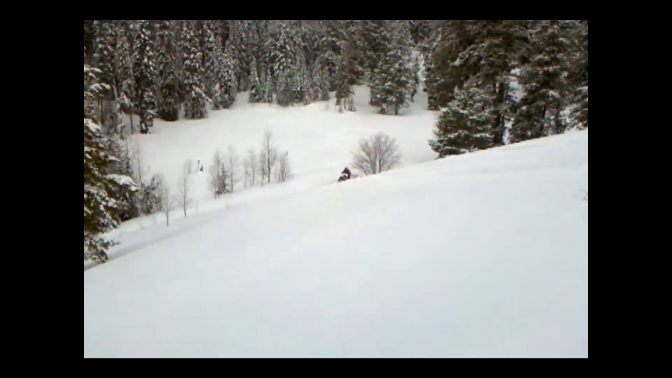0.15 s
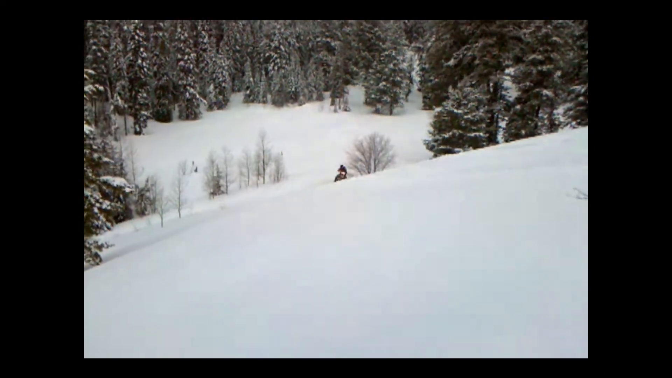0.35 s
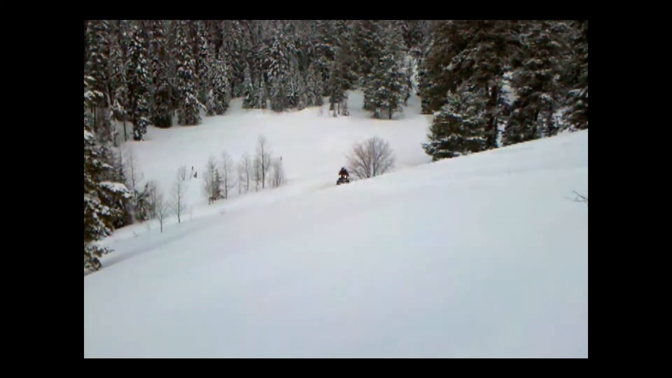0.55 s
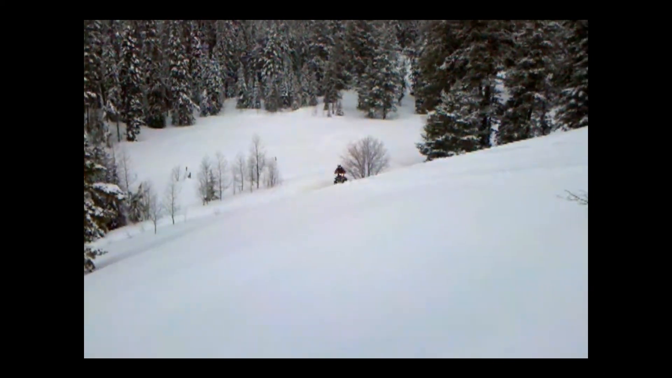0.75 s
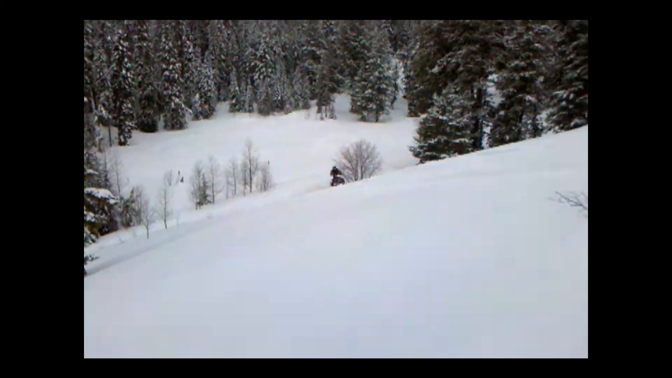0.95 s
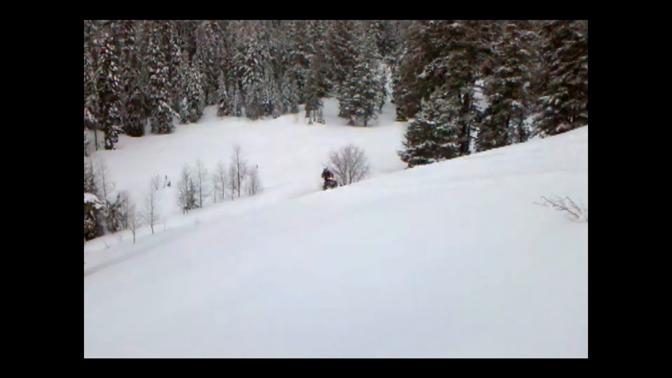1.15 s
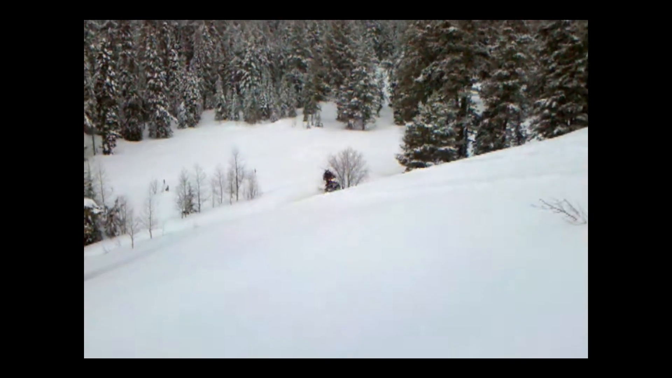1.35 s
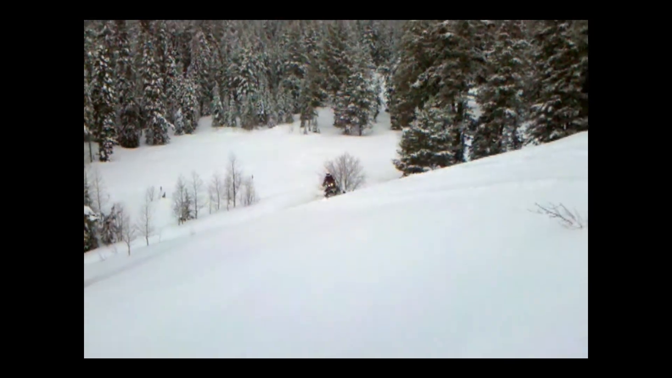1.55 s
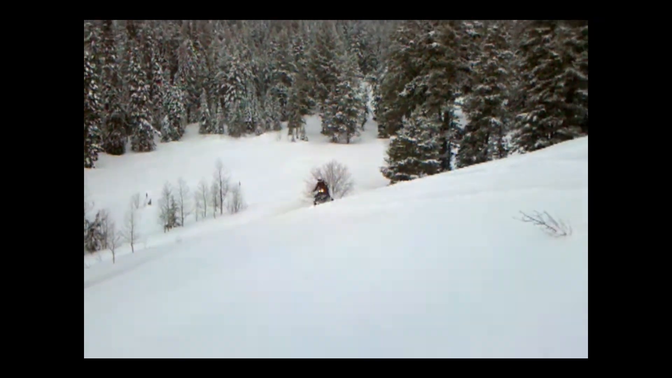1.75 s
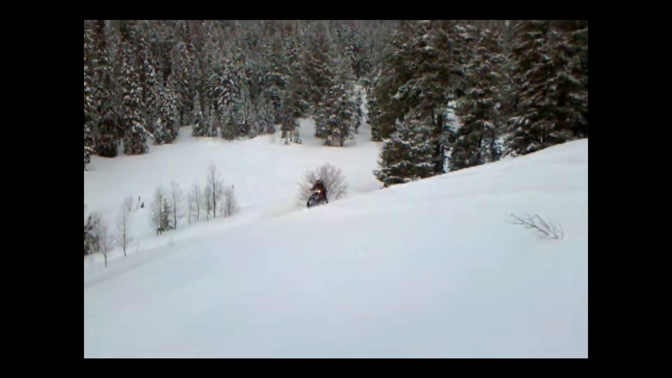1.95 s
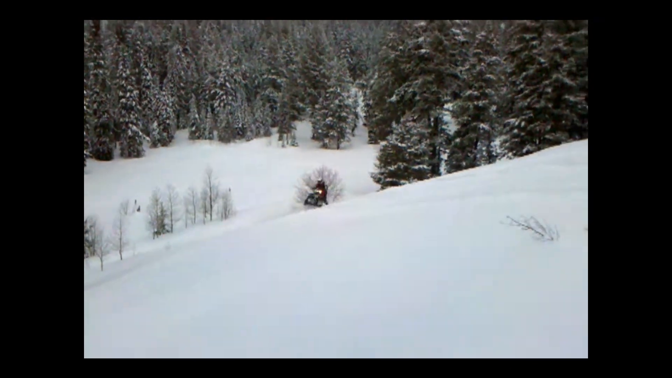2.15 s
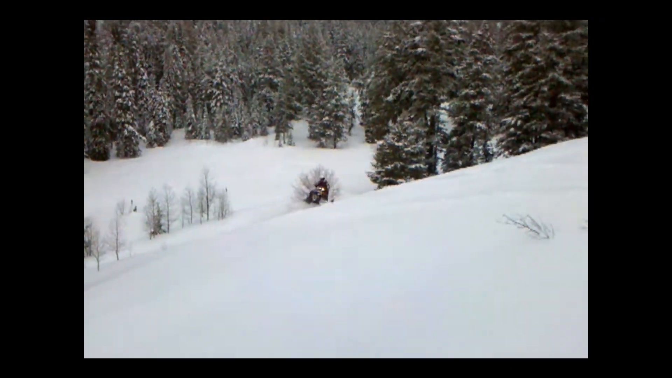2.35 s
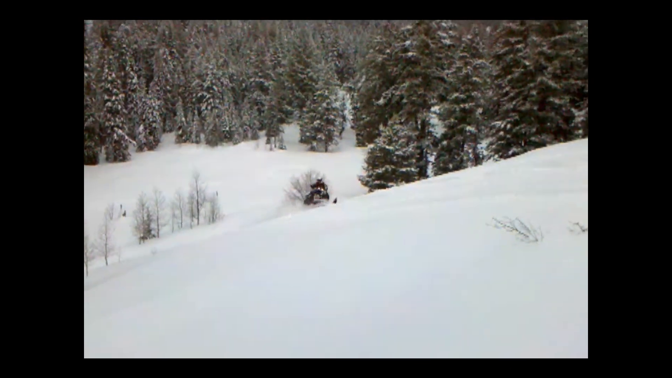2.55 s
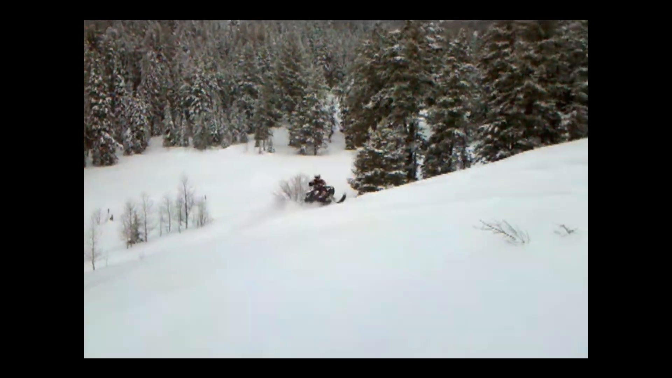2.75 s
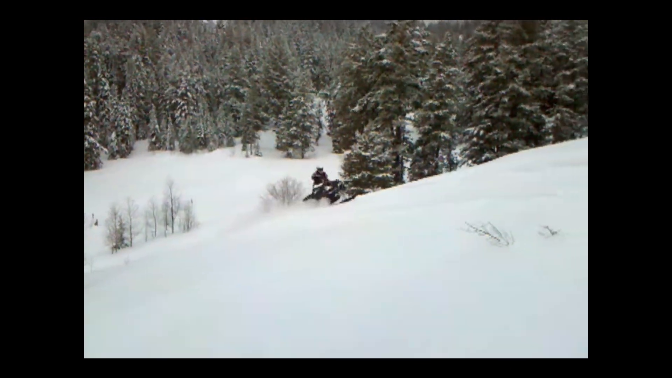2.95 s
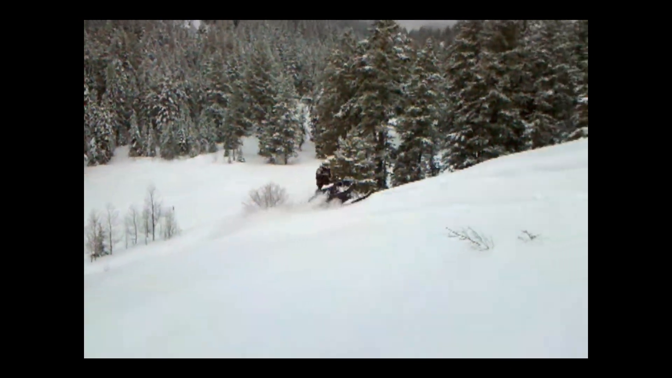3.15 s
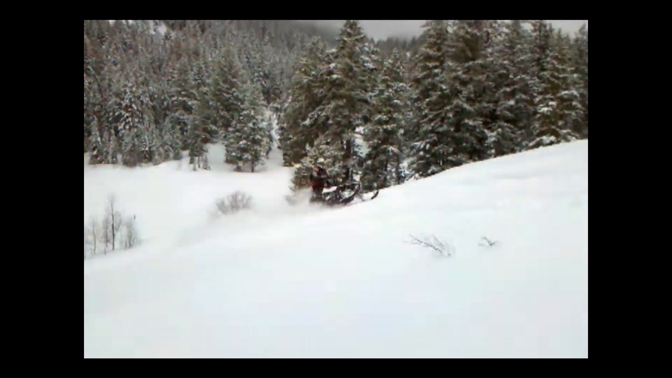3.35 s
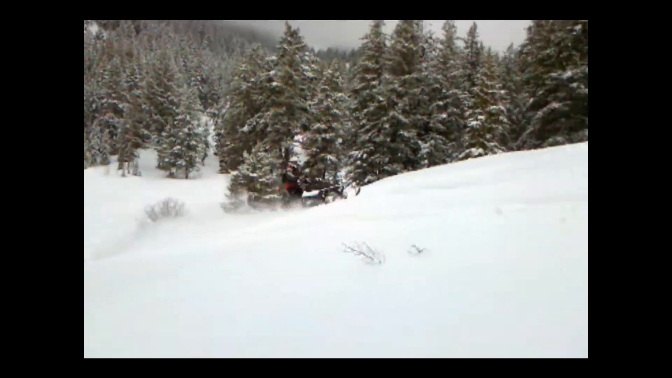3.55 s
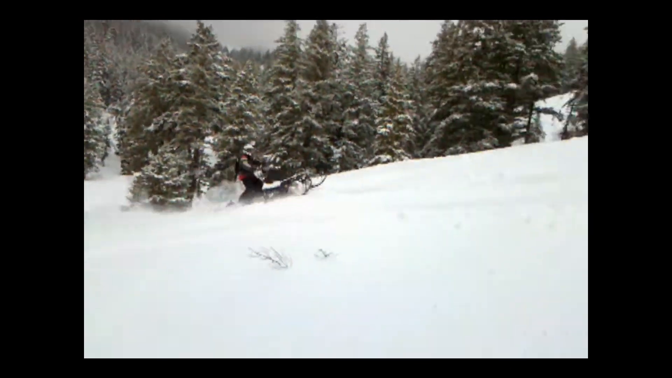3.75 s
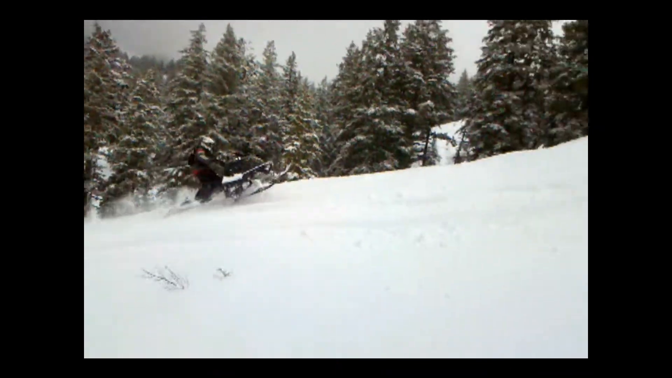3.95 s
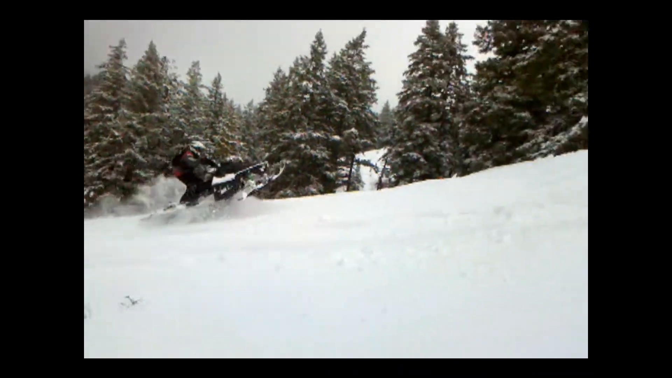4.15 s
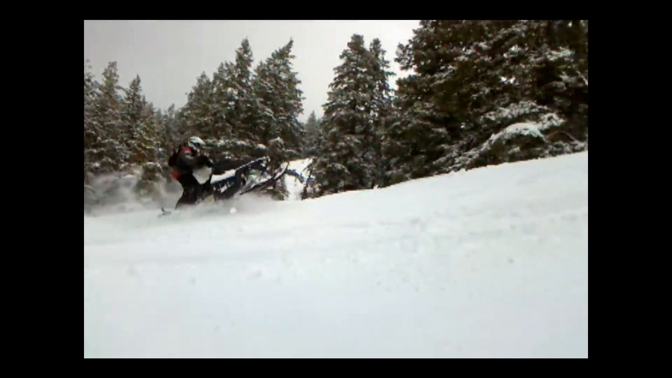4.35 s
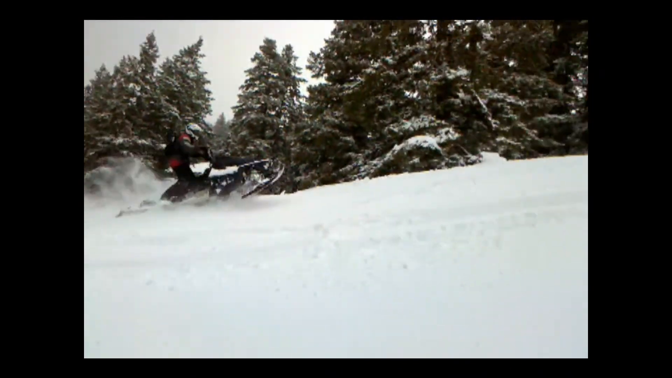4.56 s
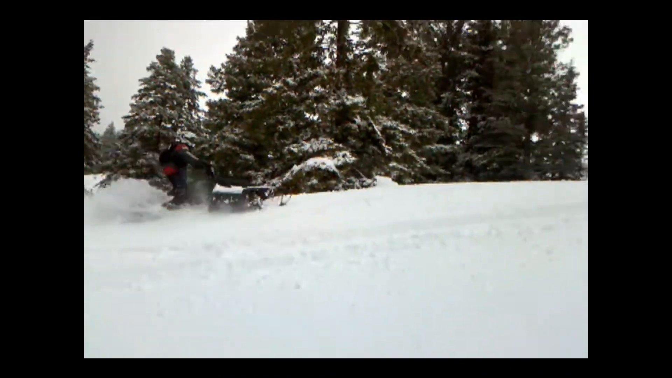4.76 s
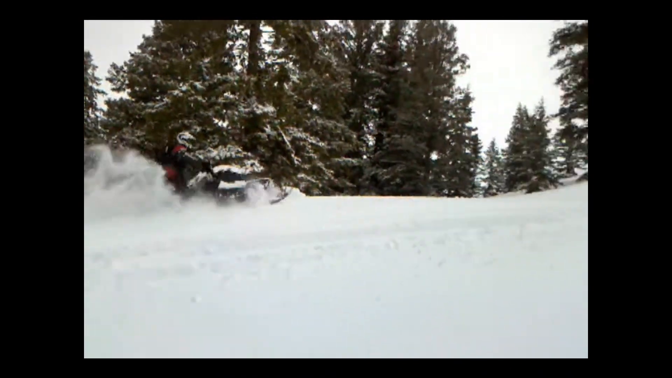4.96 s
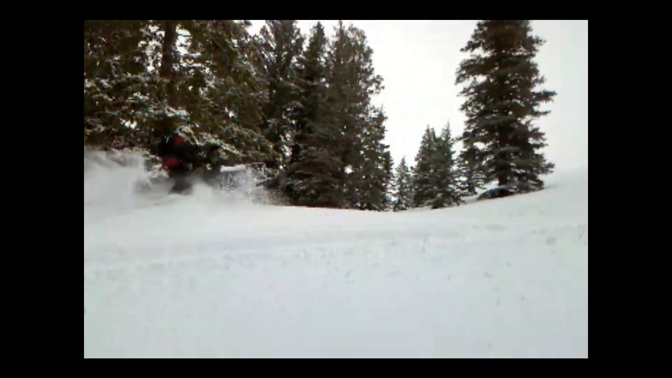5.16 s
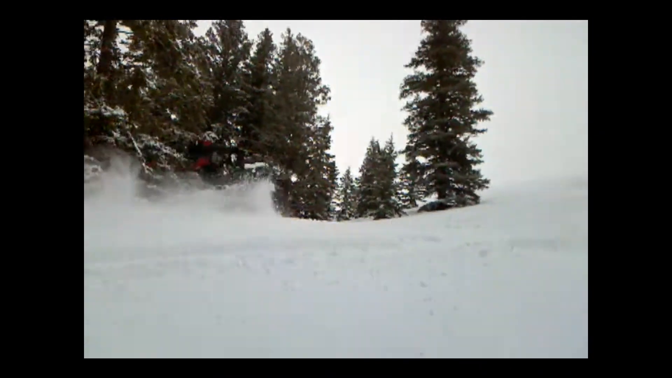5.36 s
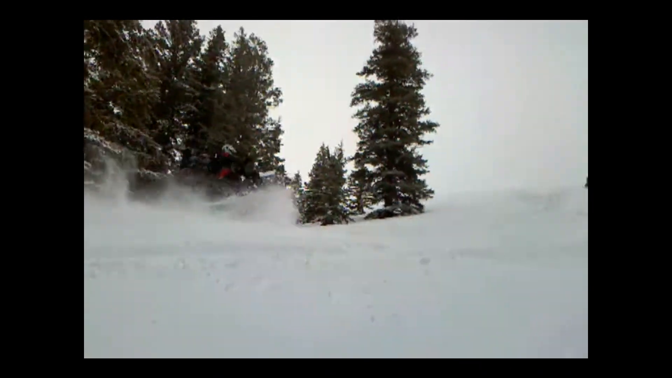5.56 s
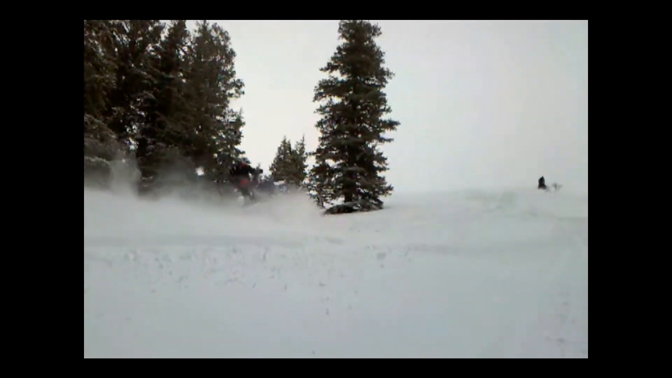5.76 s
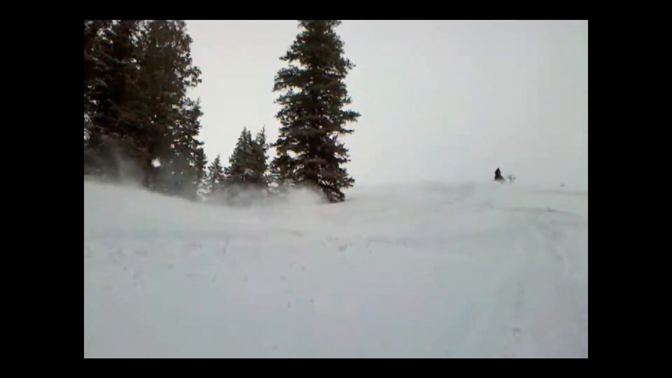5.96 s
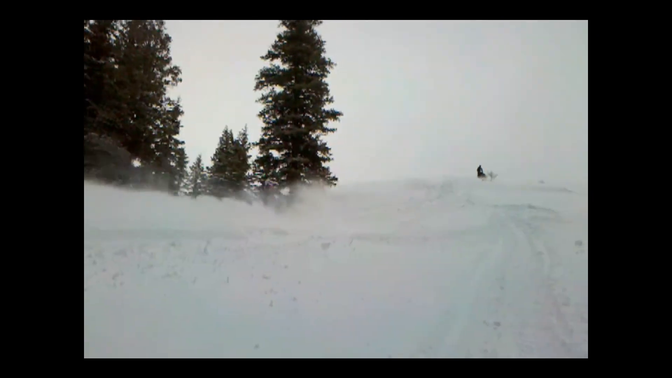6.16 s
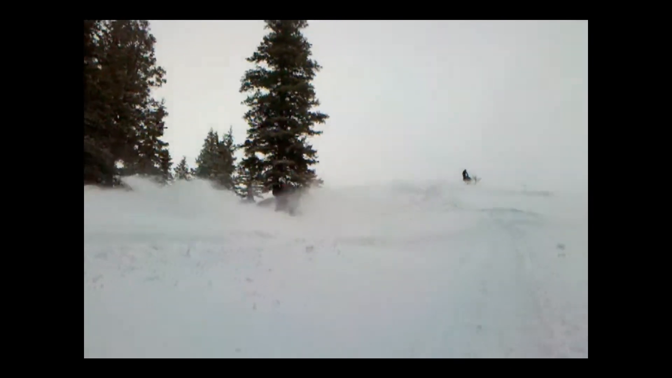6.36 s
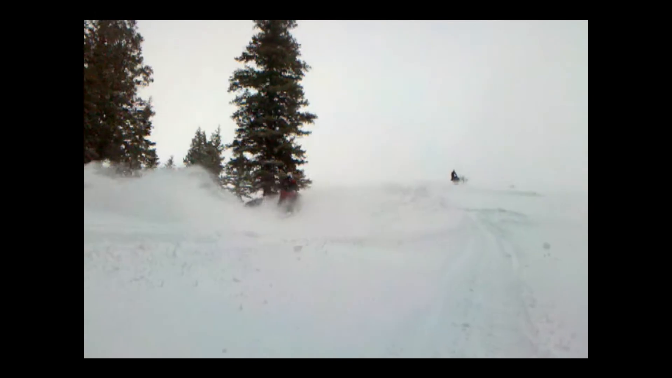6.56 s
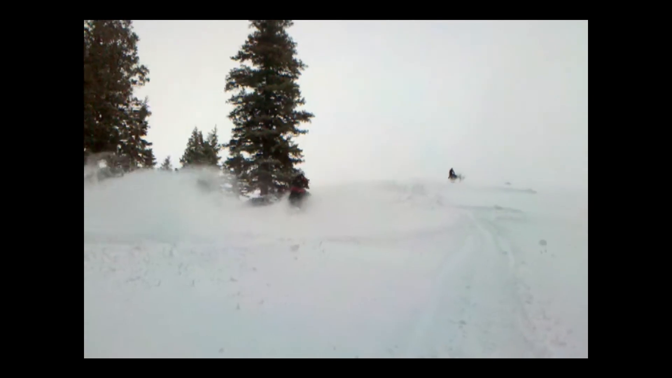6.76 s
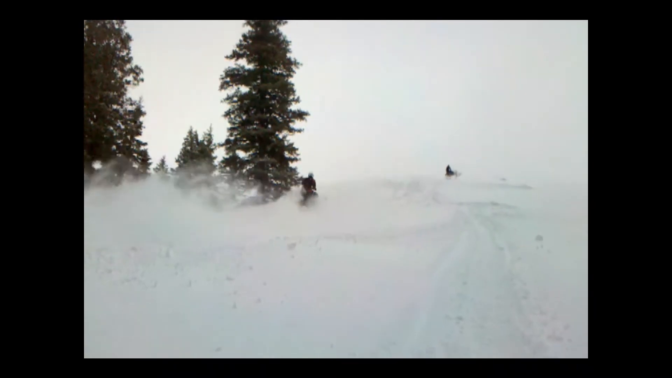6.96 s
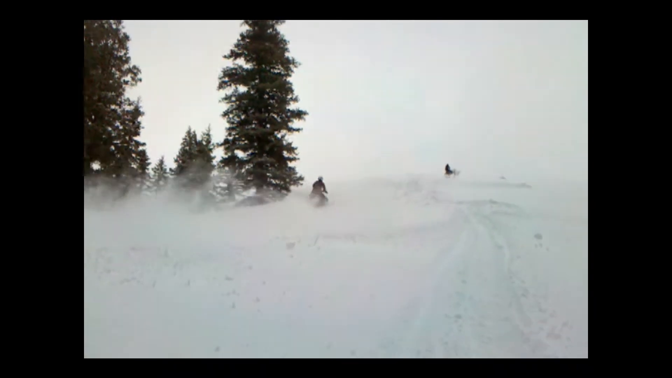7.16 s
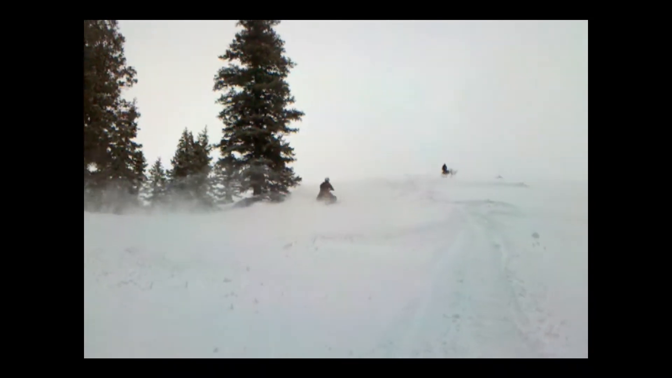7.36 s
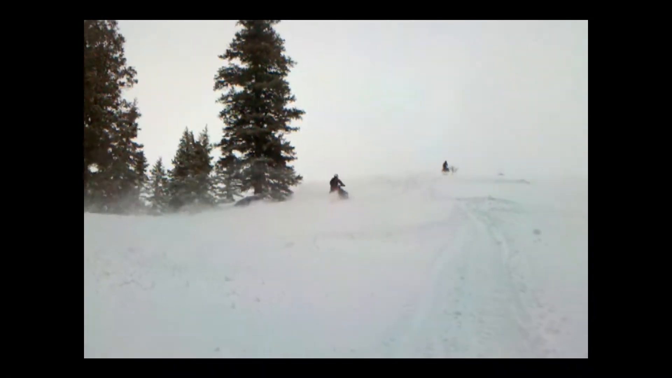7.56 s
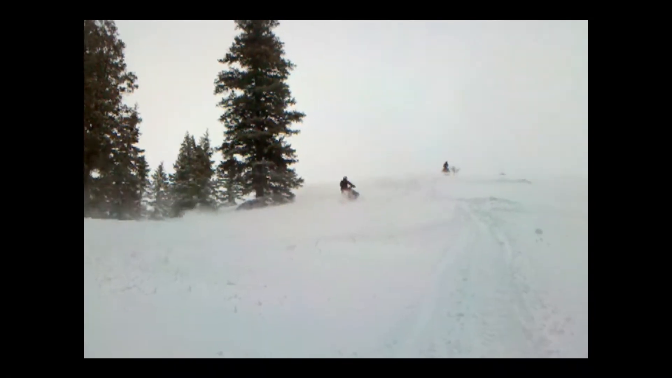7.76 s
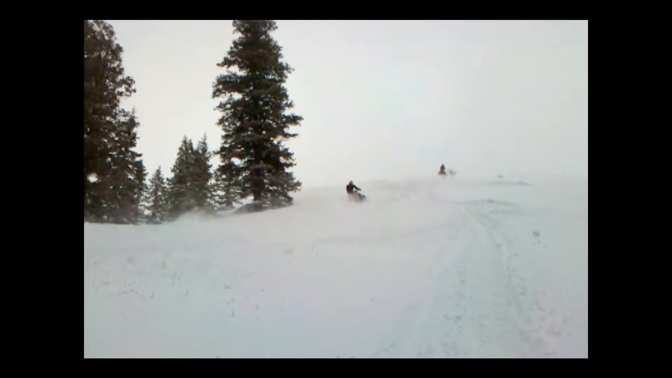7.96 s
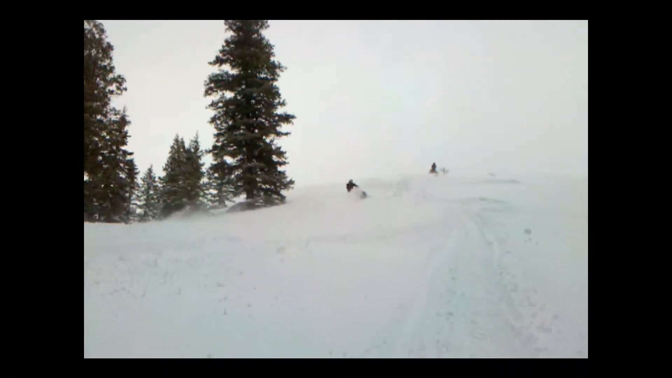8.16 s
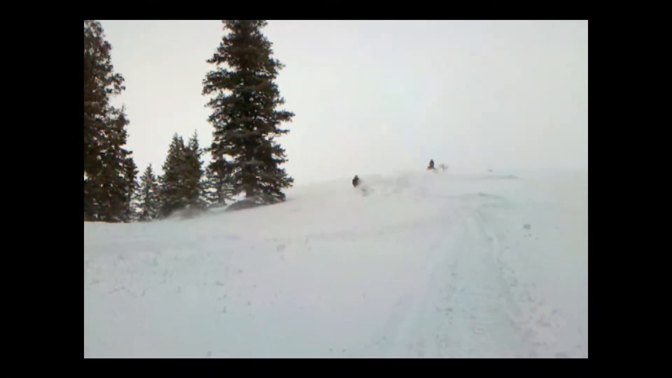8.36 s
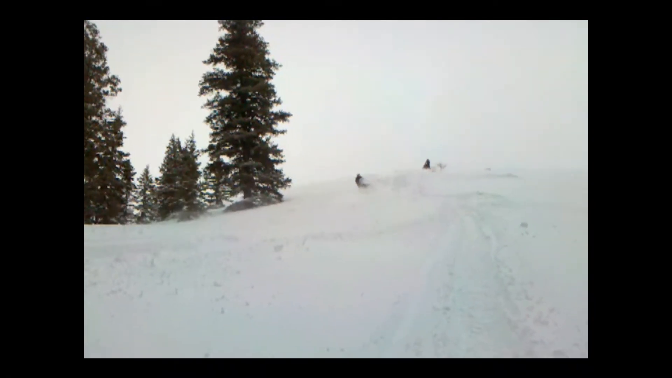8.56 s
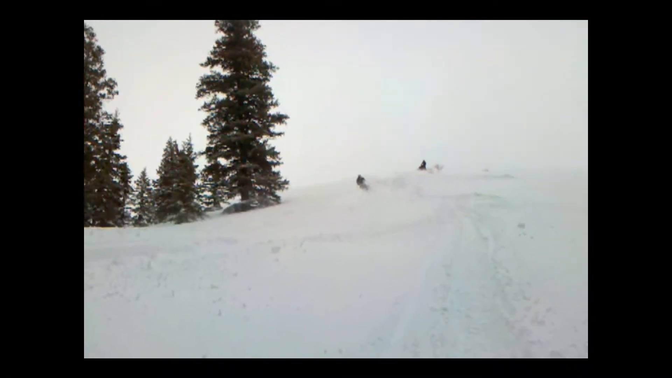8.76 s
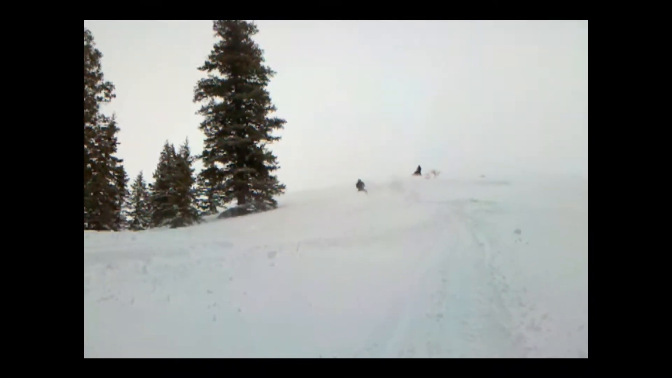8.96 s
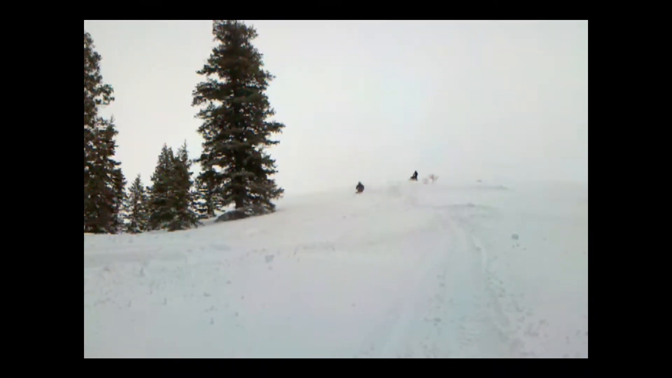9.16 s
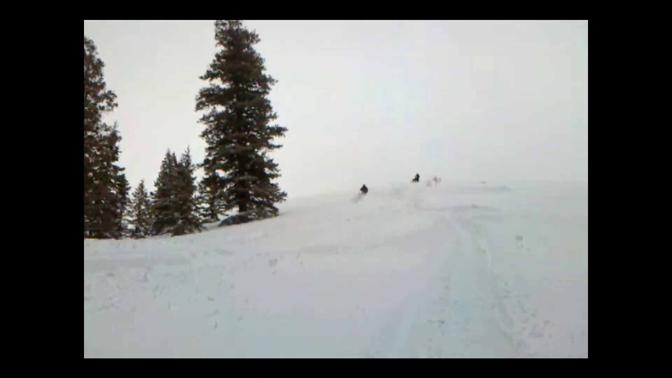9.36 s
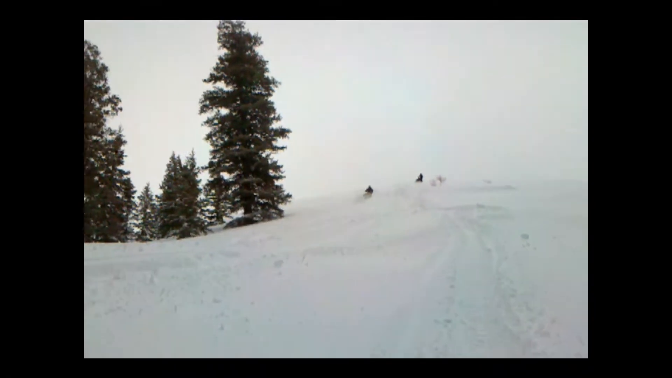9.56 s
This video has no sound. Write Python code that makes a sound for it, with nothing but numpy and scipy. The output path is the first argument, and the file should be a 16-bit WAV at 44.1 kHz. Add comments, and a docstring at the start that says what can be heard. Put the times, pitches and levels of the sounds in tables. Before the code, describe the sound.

Open snowy slope beside forest, heard in wide stereo from a fixed spot. At 0 s a snowmobile is distant and weak, picking up from low revs, while a duller second sled drones unevenly up the slope. The throttle lifts briefly near 0.4 s; from 0.8 s the two-stroke returns stronger, pumped in quick squeezes about every 0.3 s. From 2 to 3.5 s it brightens into a hard buzz with a piercing ring. Around 3.7-5 s it passes at its fullest, raspy and whining, with broad hissing spray and quick swells in tone. From 5.3 s it recedes, becoming muffled and unsteady near 6.3 s, then briefly clearer around 7 s. Revs drop at 7.2 s and recover by 7.5 s, amid low wind rumble and sharp buffets at 7.5-7.7 s. The engine thins away to 9.6 s, with another wind thump near 9.15 s and faint tree echoes.

```python
"""A two-stroke snowmobile ploughs up through deep powder, passes and climbs away, its throttle pumping.
Its exhaust and whine are sums of lines at half multiples of the firing rate; gas and snow are shaped noise.
A second sled holds its revs far up the slope, built from the same kind of lines, duller and more uneven.
Sparse decaying noise taps make the forest answer both; low noise and short pulses are the wind and its buffets.
Two close microphones hear it all and are cross-fed to widen the stereo."""
import sys
import numpy as np
from scipy import signal
from scipy.fft import rfft, irfft
from scipy.io import wavfile
from scipy.ndimage import map_coordinates

SR = 44100
rng = np.random.default_rng(int(sys.argv[2]) if len(sys.argv) > 2 else 0)


def store_pcm(level_fs):
    """Save levels as 16-bit WAV."""
    pcm = np.round(np.clip(level_fs, -1, 1) * 32767).astype(np.int16)
    wavfile.write(sys.argv[1], SR, np.atleast_2d(pcm).T)


N = 423801
HOP = 128  # samples between control frames
T = np.arange(N) / SR
FRAMES = np.arange(N // HOP + 2) * HOP / SR  # frame times, s
BINS = np.fft.rfftfreq(4 * HOP, 1 / SR)  # short-time spectrum, Hz


def amp(db):
    """Decibels to a gain."""
    return 10 ** (np.asarray(db) / 20)


def unit(x):
    """Scale to an RMS of one."""
    return x / np.sqrt(np.mean(x ** 2) + 1e-20)


def curves(rows):
    """Each column of a table, read at the frame times given by its first column."""
    s, *columns = np.transpose(rows)
    return [np.interp(FRAMES, s, column) for column in columns]


def smooth(control):
    """Straight lines from frames to samples."""
    step = np.arange(HOP) / HOP
    return (control[:-1, None] + np.diff(control)[:, None] * step).ravel()[:N]


def colour(points, hz):
    """Gain of a spectrum drawn through (Hz, dB) points, falling 60 dB per octave beyond its ends."""
    f, db = np.transpose(points)
    octave, known = np.log2(hz + 1), np.log2(f)
    beyond = abs(octave - np.clip(octave, known[0], known[-1]))
    return amp(np.interp(octave, known, db) - 60 * beyond)


def wander(hz):
    """Slow chance of unit size at the frame times, weakening above the given rate."""
    f = np.fft.rfftfreq(len(FRAMES), HOP / SR)
    spectrum = rfft(rng.standard_normal(len(FRAMES))) / (1 + (f / hz) ** 2)
    return unit(irfft(spectrum, len(FRAMES)))


def band(level_db, points):
    """Power over frames and bins of a noise of this level and colour."""
    power = colour(points, BINS) ** 2
    return amp(level_db)[:, None] ** 2 * power / power.sum()


def noise(power):
    """Noise from random short-time spectra of the given power."""
    z = rng.standard_normal(power.shape) + 1j * rng.standard_normal(power.shape)
    z = z * np.sqrt(power)
    sound = signal.istft(z.T, nperseg=4 * HOP, noverlap=3 * HOP)[1][:N]
    return np.sqrt(power.sum(1).mean()) * unit(sound)


def ease(since_s, lag_s):
    """A step from 0 to 1 that starts softly and takes about lag_s."""
    return 1 - np.exp(-(np.maximum(since_s, 0) / lag_s) ** 2)


def throttle():
    """Firing rate, the part gained by squeezes, and how far the throttle is shut (0-1)."""
    # Firing rate between squeezes; it sinks as the sled passes. # Each row: time in seconds, firings per
    # second.
    cruise = [(0.0, 242.72), (2.52, 247.15), (2.73, 251.03), (3.7, 253.17), (4.32, 252.21), (4.59, 242.01),
              (5.09, 237.97), (5.51, 243.65), (6.33, 230.76), (6.76, 240.87), (8.66, 242.44),
              (9.49, 237.64)]
    # The rider pumps the throttle.
    # Each row: start in seconds, length in seconds, firings per second gained if held.
    squeezes = [(0.822, 0.144, 18.4), (1.093, 0.151, 15.6), (1.349, 0.175, 14.7), (1.627, 0.202, 13.8),
                (1.927, 0.212, 12.6), (2.239, 0.131, 18.4), (2.506, 0.279, 7.3), (2.842, 0.171, 8.7),
                (3.196, 0.343, 5.3), (3.936, 0.179, 8.4), (4.6, 0.185, 16.7), (5.118, 0.182, 14.8),
                (5.573, 0.182, 12.3), (5.9, 0.288, 8.2), (6.441, 0.203, 14.4), (6.879, 0.151, 10.3),
                (7.79, 0.048, 21.0), (8.059, 0.278, 6.4), (8.766, 0.081, 12.9), (9.205, 0.248, 12.1)]
    # The rider lets go and the revs fall towards idle.
    # Each row: throttle shut in seconds, revs pick up in seconds, idle in firings per second.
    lifts = [(-.405, .142, 174.6), (.393, .578, 179.5), (7.232, 7.46, 160.5)]
    spin_up_s, spin_down_s = .119, .11
    full_hz, coast_s, climb_hz_per_s = 250, .078, 225
    shut_s, open_s = .018, .06
    pickup_s = .09  # the throttle starts to reopen this long before the revs answer

    surge_hz = 0
    for start, length, gain_hz in squeezes:
        rise = ease(FRAMES - start, spin_up_s)
        release = 1 - ease(FRAMES - start - length, spin_down_s)
        surge_hz = surge_hz + gain_hz * rise * release
    firing_hz, shut = curves(cruise)[0] + surge_hz, 0
    for start, pickup, idle_hz in lifts:
        coast = (full_hz - idle_hz) * np.exp(np.minimum((start - FRAMES) / coast_s, 1))
        climb = climb_hz_per_s * np.maximum(FRAMES - pickup, 0)
        firing_hz = np.minimum(firing_hz, idle_hz + coast + climb)
        shut = shut + ease(FRAMES - start, shut_s) * (1 - ease(FRAMES - pickup + pickup_s, open_s))
    return firing_hz, surge_hz, shut


def crank(firing_hz, wobble):
    """Firings counted so far; combustion makes the speed a little unsteady."""
    return np.cumsum(smooth(firing_hz * (1 + wobble * wander(43.8)))) / SR


def stutter(turns, ragged):
    """At low revs the burns swell and weaken over four firings, which crowds the gaps between the lines."""
    depth = .15 * ragged
    beat = np.cos(2 * np.pi * turns / 4 + smooth(wander(8)))
    return (1 + smooth(depth) * beat) / smooth(np.sqrt(1 + depth ** 2 / 2))


def flare_db(order):
    """How far this order stands out from its neighbours, at the frame times."""
    # Single orders swell for a moment, on both sleds.
    # Each row: start in seconds, end in seconds, order as a multiple of the firing rate, boost in dB.
    flares = [(0.453, 0.557, 4, 8), (0.607, 0.796, 2, 4), (0.897, 2.847, 17, 3.5), (2.879, 3.066, 4, 8.5),
              (3.212, 3.45, 4, 9), (3.385, 3.644, 7, 0.5), (3.49, 3.74, 18, 7.5), (4.374, 4.464, 17, 10.5),
              (4.44, 4.62, 4, 5), (4.88, 4.937, 18, 13.5), (4.976, 5.348, 19, 6.5), (5.928, 6.206, 5, 9),
              (6.7, 7.24, 6.5, 5)]
    edge_s = .04
    total_db = 0
    for start, end, which, db in flares:
        inside = np.clip(np.minimum(FRAMES - start, end - FRAMES) / edge_s + .5, 0, 1)
        total_db = total_db + db * (abs(order - which) < .25) * inside
    return total_db


def orders(firing_hz, turns, voices, imbalance_db, fade_db, flutter, count):
    """Crankshaft harmonics through the voices; unequal cylinders add lines between firing orders."""
    ring_order, ring_steadiness, fade_top_order = 8, .6, 11
    k = np.arange(1, count + 1) / 2
    weight = np.where(k[:, None] % 1 > 0, amp(imbalance_db), 1)
    power = 0
    for level_db, points in voices:
        lines = (weight * colour(points, k[:, None] * firing_hz)) ** 2
        power = power + amp(level_db) ** 2 * lines / lines.sum(0)
    out = np.zeros(N)
    for order, line in zip(k, np.sqrt(2 * power)):
        # shifting paths over the snow fade each line; low orders, the ring and flaring lines are the steadiest
        flare = amp(flare_db(order))
        unsteady = (1 - ring_steadiness * (order == ring_order)) / np.sqrt(flare)
        shake = unsteady * flutter * np.sqrt(min(order, 5))
        depth_db = unsteady * fade_db * np.sqrt(min(order, fade_top_order))
        fade = amp(depth_db * wander(4.5) - depth_db ** 2 * np.log(10) / 20)  # keeps the mean power
        tremble = (1 + shake * wander(32)) / np.sqrt(1 + shake ** 2)
        size = line * flare * fade * tremble
        shift = shake * wander(54) + 0.49 * wander(0.64) + 2 * np.pi * rng.random()
        phase = 2 * np.pi * (order * turns % 1) + smooth(shift)
        out += smooth(size) * np.cos(phase.astype("float32"))
    return out


def ports(x, lag_ms):
    """One sound at the two microphones, the right one later by the lag, or earlier if it is negative."""
    return np.array([x, map_coordinates(x, [(T - lag_ms / 1000) * SR], order=3)])


def forest(x, t60=.4, treble_hz=4500):
    """Scattered echoes from the trees, duller than the direct sound."""
    t = np.arange(SR) / SR
    sparse = rng.standard_normal(SR) * (rng.random(SR) < .05)
    taps = sparse * amp(-60 * t / t60) * (t > .02)  # the first tree is 20 ms away
    dull = signal.butter(1, treble_hz, fs=SR, output="sos")
    taps = signal.sosfilt(dull, taps / np.linalg.norm(taps))
    return signal.fftconvolve(x, taps)[:N]


def exhaust_voices():
    """Resonant colours of the exhaust, each with its level: thrum alone, two low voices, three high ones."""
    # Levels. Each row: time in seconds, level in dB before burning, fading and flares.
    # The thrum, the deepest note, fades in and out with the lie of the ground, which also shades the drone.
    thrum_level = [(0.0, -56), (0.6, -48), (0.9, -45.5), (2.43, -37), (3.06, -45.5), (3.3, -57.5),
                   (4.32, -36.5), (4.83, -39.5), (5.04, -51), (5.28, -38.5), (6.33, -56), (6.66, -42.5),
                   (7.11, -42.5), (7.5, -45.5), (8.28, -49.5), (9.6, -44.5)]
    drone_level = [(0.0, -53), (0.81, -46), (0.96, -36.5), (1.35, -40), (1.74, -37.5), (2.25, -44),
                   (2.4, -38.5), (2.46, -56), (2.55, -37), (3.21, -37.5), (3.66, -54), (4.05, -51.5),
                   (4.14, -39), (4.38, -38), (4.83, -47), (5.19, -37), (5.94, -39.5), (6.27, -49),
                   (6.96, -46), (7.2, -50), (7.26, -61), (8.61, -48.5), (9.6, -47.5)]
    pipe_level = [(0.0, -60), (0.5, -45.5), (0.72, -56), (0.87, -35), (1.86, -39.5), (2.55, -31.5),
                  (3.03, -36.5), (3.12, -44.5), (3.27, -39.5), (3.6, -55), (3.69, -43.5), (4.53, -31.5),
                  (4.8, -35), (4.89, -52.5), (5.19, -33), (6.15, -40.5), (6.33, -55.5), (6.96, -45),
                  (7.2, -47.5), (7.32, -65), (7.89, -49.5), (8.85, -51.5), (9.36, -64), (9.6, -56.0)]
    rasp_level = [(0.0, -55.5), (0.75, -45), (1.38, -47.5), (2.61, -40), (2.79, -45), (2.91, -33.5),
                  (3.51, -35), (3.75, -32.5), (4.44, -32.5), (4.5, -37), (4.77, -32), (5.01, -47),
                  (5.102, -38.5), (5.37, -42), (6.09, -44), (6.3, -53), (6.57, -49.5), (6.96, -39.5),
                  (7.23, -42), (7.35, -51), (7.77, -42.5), (8.37, -58), (9.06, -49), (9.6, -68)]  # strongest as the sled draws near
    ring_level = [(0.0, -55), (0.78, -67), (1.3, -43.5), (1.93, -54), (2.1, -33.5), (2.25, -37),
                  (2.4, -31.5), (2.55, -39), (2.77, -25), (3.04, -29), (3.19, -33.5), (3.3, -24.5),
                  (3.43, -23.5), (3.57, -25.5), (3.7, -43), (4.04, -26), (4.14, -37), (4.351, -50),
                  (4.469, -25.5), (4.65, -35.5), (4.74, -23.5), (4.92, -32), (5.01, -39), (5.4, -42.5),
                  (5.761, -36), (5.84, -50), (6.05, -35.5), (6.48, -56), (6.63, -39.5), (6.74, -50),
                  (7.0, -33.5), (7.23, -42.5), (7.32, -62), (7.65, -67), (7.85, -40), (8.46, -54.5),
                  (8.88, -50), (9.33, -60), (9.6, -53)]  # ring of the silencer
    buzz_level = [(0, -59), (.95, -47.5), (2.85, -33), (4.2, -43), (4.75, -35.5), (6.1, -43), (7.3, -49.5),
                  (7.9, -41.5), (8.4, -52)]  # just above the ring
    # Colours. Each row: frequency in Hz, relative gain in dB.
    thrum_colour = [(80, -12), (125, -2), (180, 20), (255, 7), (310, -19)]
    drone_colour = [(310, 9), (380, 15.5), (510, 11), (620, -2), (720, -35)]
    pipe_colour = [(540, -15), (660, 5), (765, 7.5), (870, 10.5), (985, -3.5), (1040, -5), (1130, 3),
                   (1260, -11.5)]
    rasp_colour = [(950, -4.5), (1120, -6), (1260, 0), (1400, 5.5), (1530, 4), (1640, 11), (1780, 8.5),
                   (1880, 9)]
    ring_colour = [(1780, -37), (1900, 9), (1990, 7), (2080, 9.5), (2170, -4.5)]
    buzz_colour = [(2120, -3), (2280, 0), (2550, -6), (2750, -5.5)]

    thrum = [(curves(thrum_level)[0], thrum_colour)]
    low = [(curves(drone_level)[0], drone_colour), (curves(pipe_level)[0], pipe_colour)]
    high = [(curves(rasp_level)[0], rasp_colour), (curves(ring_level)[0], ring_colour),
            (curves(buzz_level)[0], buzz_colour)]
    return thrum, low, high


def engine_whine(firing_hz, turns, burn, puffs):
    """The engine's high whine: rough, strongly fluttering lines with puffing noise of the same colour."""
    # Each row: time in seconds, level in dB before burning, fading and flares.
    whine_level = [(0.0, -63), (0.69, -52.5), (0.93, -42), (2.4, -38), (3.18, -45.5), (3.33, -41.5),
                   (4.32, -43.5), (4.41, -40), (5.3, -48), (6.0, -58.5), (6.12, -44), (6.3, -64),
                   (7.23, -48), (7.32, -66), (7.89, -42.5), (8.16, -56.5), (9.27, -66.5), (9.6, -53.5)]
    # Each row: frequency in Hz, relative gain in dB.
    whine_colour = [(3400, -19.5), (3620, 2.5), (3870, 1.5), (4080, -1), (4350, 4.5), (4620, 1), (4900, 0),
                    (5400, -3)]
    level_db = curves(whine_level)[0]
    lines = orders(firing_hz, turns, [(level_db, whine_colour)], imbalance_db=-10, fade_db=.95,
                   flutter=.14, count=50)
    return burn * lines + puffs * noise(band(level_db - 10, whine_colour))


def spray(surge_hz, shut, top_db, puffs):
    """Hiss of exhaust, track and thrown snow, swelling with each squeeze: a direct part and a wide plume."""
    # Strongest alongside. Each row: time in seconds, level in dB before the throttle's answer and the lift.
    hiss_level = [(0.0, -50.5), (0.69, -49.5), (0.87, -40.5), (1.86, -39), (3.2, -41.5), (3.85, -33.5),
                  (4.54, -33.5), (5.68, -40), (6.7, -45), (7.09, -39.5), (8.24, -49), (9.6, -53.5)]
    # Each row: frequency in Hz, relative gain in dB.
    hiss_colour = [(150, -0.5), (400, -7), (900, -3), (1500, -1), (2400, 4), (3300, -2.5), (4500, -7),
                   (5900, -1.5), (7000, 1.5), (8000, 6.5), (9200, 6), (10500, 4), (12500, 6.5), (14000, -5)]
    # How the hiss answers the throttle: dB per firing per second gained, dB with the throttle shut.
    hiss_answer = (0.15, -7)
    db_per_hz, shut_db = hiss_answer
    lift_db = 5
    level_db = curves(hiss_level)[0] + db_per_hz * surge_hz + shut_db * shut
    flicker_db = 1.5 * wander(10)
    # the top treble sinks and returns as the sled turns
    shadow = amp(top_db[:, None] * np.clip((BINS - 8500) / 3500, 0, 1))
    power = band(level_db + lift_db + flicker_db, hiss_colour) * shadow ** 2
    # treble arrives from all over the plume, so the microphones hear it differently
    scattered = np.clip((BINS / 7000) ** 2, 0, .85)
    direct = puffs * noise(power * (1 - scattered))
    plume = puffs * np.array([noise(power * scattered) for _ in range(2)])
    return direct, plume


def near_sled(echo_db=-19, low_gas_db=-4, chop=0.017, whine_lag_share=0.18):
    """Exhaust lines, a rough whine, gas noise puffing with each firing, hiss of snow, and forest echoes."""
    # What changes as the sled turns from nose to tail.
    # Each row: time in seconds, lag of the right microphone in ms,
    # cylinder imbalance in dB before ragged burning, full top treble change in dB.
    aspect = [(0, 0.044, -6, -13), (.7, 0.062, -23, -6.5), (1.2, 0.098, -18.5, -4),
              (2.6, 0.11, -15.5, -7.5), (3.7, 0.11, -20, -8), (4.6, 0.17, -12, -3), (6.2, 0.073, -12, -9.5),
              (7.1, 0.031, -8, -14.5), (7.35, 0.014, -16, -21), (7.9, 0.0075, -7.5, -9.5),
              (9.61, 0.026, -7, -14.5)]
    # Noise in the exhaust, larger while the sled is far off or buried in powder.
    # Each row: time in seconds, power share in dB before misfires add to it.
    gas_share = [(.8, -11), (1.8, -12), (2.7, -24), (7.7, -24), (8.3, -15), (9.61, -10)]
    firing_hz, surge_hz, shut = throttle()
    lag_ms, imbalance_db, top_db = curves(aspect)
    gas_db = curves(gas_share)[0]

    # below the revs the pipe is tuned for the engine burns raggedly, fully so 25 firings per second lower
    on_pipe_hz, ragged_span_hz = 238, 25
    ragged = np.clip((on_pipe_hz - firing_hz) / ragged_span_hz, 0, 1)
    turns = crank(firing_hz, wobble=.0007 + .0005 * ragged)
    # ragged burning turns part of the note into gas noise, unbalances the cylinders and breaks up the lines
    noisy = np.clip(amp(gas_db) ** 2 + .005 * ragged, 0, .9)
    imbalance_db = imbalance_db * (1 - ragged / 2)
    flutter = .025 + .04 * ragged
    fade_db = .85 + .8 * ragged + 2 * amp(gas_db)  # lines fade more when the gas is strong
    # the lines drop quickly by 8 dB when the throttle shuts
    burn = stutter(turns, ragged) * smooth(np.sqrt(1 - noisy) * amp(-8 * shut))
    puffs = unit(1 + chop * np.cos(2 * np.pi * turns))

    thrum, low, high = exhaust_voices()
    tone = burn * orders(firing_hz, turns, thrum + low + high, imbalance_db, fade_db, flutter, count=30)
    low_gas = amp(low_gas_db) ** 2 * sum(band(*voice) for voice in low)  # the low voices stay cleaner
    high_gas = sum(band(*voice) for voice in high)
    gas = puffs * noise(noisy[:, None] * (low_gas + high_gas))
    whine = engine_whine(firing_hz, turns, burn, puffs)
    hiss, plume = spray(surge_hz, shut, top_db, puffs)

    direct = tone + gas + hiss
    echo = amp(echo_db) * forest(direct + whine)
    placed = ports(direct, smooth(lag_ms)) + ports(whine, smooth(whine_lag_share * lag_ms))
    return placed + plume + echo


def far_sled(imbalance_db=-1, echo_db=-9, gas_db=-11):
    """An uneven drone from up the slope, off to the right: fluttering lines, a little gas noise, tree echoes."""
    # Each row: time in seconds, firings per second, level in dB before fading and flares.
    far_revs = [(0, 242, -37.5), (.2, 237, -39), (.55, 250, -36.5), (.93, 241, -35.5), (1.5, 237, -49),
                (3.2, 246, -45), (6, 267, -79), (9.61, 250, -55.5)]
    # Each row: frequency in Hz, relative gain in dB.
    far_colour = [(120, -17.5), (243, 7), (365, -3), (490, -8.5), (610, -0.5), (730, -6), (850, -1.5),
                  (970, -9.5), (1200, -12), (1340, -1), (1470, -1), (1800, -7), (4500, -10)]
    firing_hz, level_db = curves(far_revs)
    turns = crank(firing_hz, wobble=0.0027)
    tone = orders(firing_hz, turns, [(level_db, far_colour)], imbalance_db, fade_db=1.0, flutter=0.093, count=20)
    gas = noise(band(level_db + gas_db, far_colour))
    return ports(tone + amp(echo_db) * forest(tone) + gas, lag_ms=-0.23)


def wind(lumps_db=5.5, wake_db=-17, wake_s=0.0068):
    """Lumpy turbulence, different at each microphone; a buffet is a sharp pressure pulse on the left in a swirl."""
    # Each row: time in seconds, level in dB before a 3 dB trim and the lumps.
    gusts = [(0, -55), (.3, -45), (.5, -56), (1.7, -48.5), (2.4, -58), (3.6, -75), (3.8, -41.5), (4, -79),
             (6.2, -53.5), (7.15, -49), (7.5, -40), (7.85, -41.5), (8, -49), (9.05, -50.5), (9.16, -44.5),
             (9.61, -46.5)]
    # Each row: frequency in Hz, relative gain in dB.
    wind_colour = [(25, -34), (60, -18), (125, -7), (220, -11), (400, -20.5), (800, -44), (2000, -31)]
    # Sharp buffets of air.
    # Each row: time in seconds, pulse peak in dB before the microphone stage, half length in ms.
    buffets = [(7.498, -27, .8), (7.514, -30, .8), (7.655, -19, .72), (9.144, -15.5, 1.2), (9.157, -27, .9),
               (9.252, -29, 1.1), (9.279, -29, 1.1)]
    level_db = curves(gusts)[0] - 3.0
    shape = colour(wind_colour, np.fft.rfftfreq(N, 1 / SR))
    eddies = np.array([unit(irfft(rfft(rng.standard_normal(N)) * shape, N)) for _ in range(2)])
    out = eddies * [smooth(amp(level_db + lumps_db * wander(22.0))) for _ in range(2)]
    for s, peak_db, half_ms in buffets:
        near = abs(T - s) < .1
        t = T[near] - s
        u = t * 1000 / half_ms
        pulse = (2 * u ** 2 - 1) * np.exp(-u ** 2)
        swirl = amp(wake_db) * np.exp(-abs(t) / wake_s) * eddies[0, near]
        out[0, near] += amp(peak_db) * (pulse + swirl)
    return out


def scene():
    """Both sleds and the wind together at the two microphones."""
    return near_sled() + far_sled() + wind()


def record(dry, crossfeed=0.88, left_db=3.0, cutoff_hz=14050):
    """Each channel has the other, delayed and slightly dulled, taken from it to widen; then a treble limit."""
    heard = dry * amp([[left_db], [0]])  # the left microphone is a little more sensitive
    late = np.pad(heard[::-1], ((0, 0), (15, 0)))[:, :N]  # 15 samples late
    late = signal.convolve(late, [[.06, .88, .06]], "same")
    wide = heard - crossfeed * late
    lowpass = signal.firwin(511, cutoff_hz, window=("kaiser", 9), fs=SR)
    return signal.oaconvolve(wide, lowpass[None], "same")


dry = scene()
out = record(dry)
store_pcm(out)
```